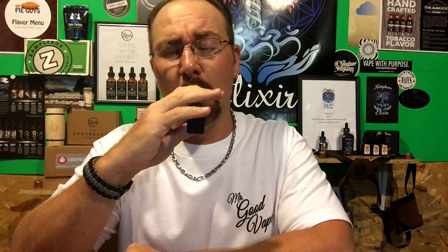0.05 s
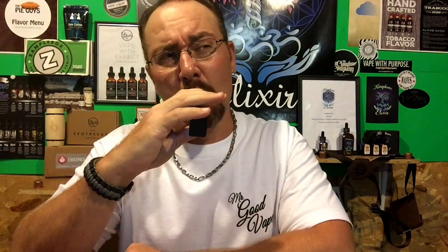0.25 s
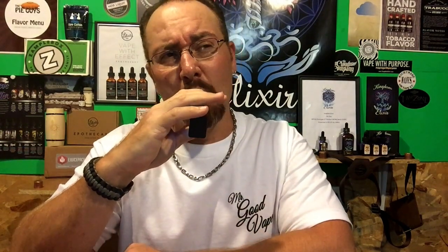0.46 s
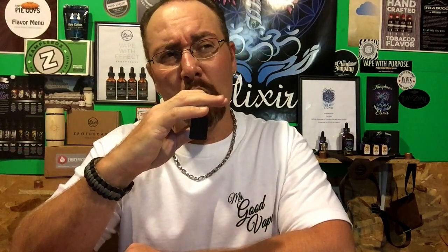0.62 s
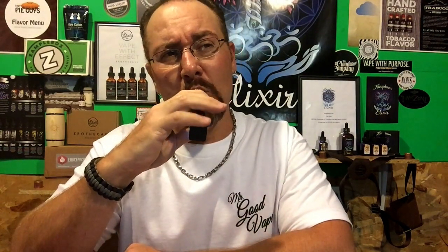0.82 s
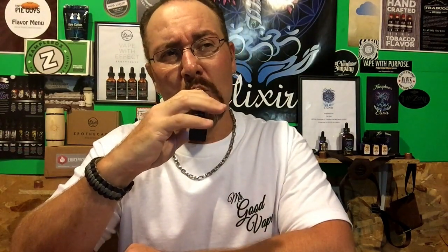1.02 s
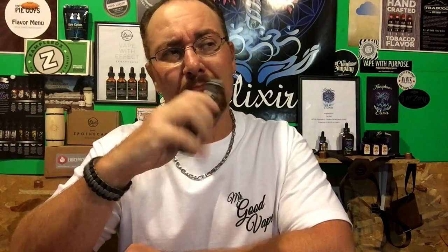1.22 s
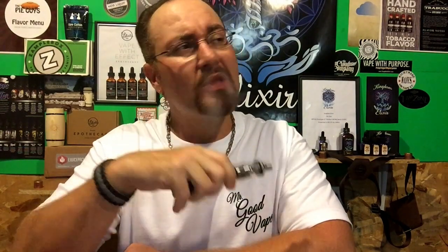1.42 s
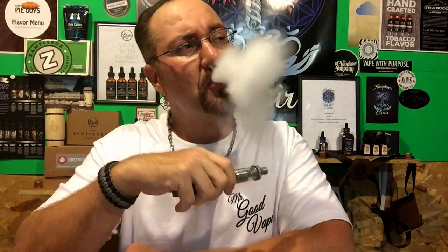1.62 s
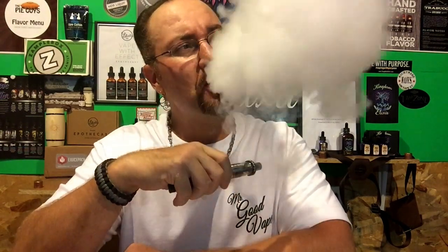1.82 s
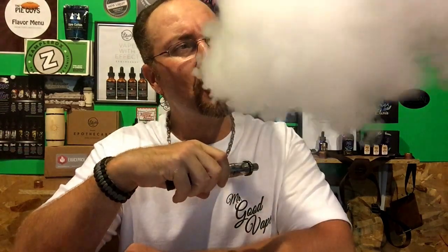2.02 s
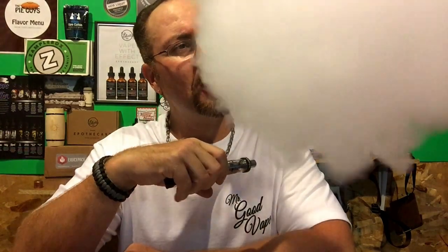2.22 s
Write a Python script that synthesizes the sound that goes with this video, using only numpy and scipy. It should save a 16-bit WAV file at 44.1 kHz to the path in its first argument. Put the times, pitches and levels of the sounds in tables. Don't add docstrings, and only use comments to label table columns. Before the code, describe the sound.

Airy, crackling hiss of an electronic vaporizer being drawn on, then one quick lip-like crackling pop.

```python
import sys
import numpy as np
from scipy import signal
from scipy.io import wavfile
from scipy.ndimage import uniform_filter1d

SR = 44100
rng = np.random.default_rng(int(sys.argv[2]) if len(sys.argv) > 2 else 0)


def pcm_store(signal):
    levels = np.round(np.clip(np.atleast_2d(signal), -1, 1) * 32767)
    wavfile.write(sys.argv[1], SR, levels.astype(np.int16).T)


def invert_db(x):
    u = np.asarray(x, float) / 20
    return 10 ** u


N = 99533


def level(x, db):
    return x * invert_db(db) / np.sqrt(np.mean(x ** 2))


def band(x, hz, width_hz):
    return signal.lfilter(*signal.iirpeak(min(hz, .45 * SR), hz / width_hz, fs=SR), x)


def band_noise(hz, width_hz):
    return band(band(rng.standard_normal(N), hz, width_hz), hz, width_hz)


def curve(table, column):
    rows = np.array(table)
    return np.interp(np.arange(N) / SR, rows[:, 0], rows[:, column])


def walk(rate_hz):
    hold = int(SR / rate_hz)
    steps = np.repeat(rng.standard_normal(N // hold + 1), hold)
    return 1.13 * uniform_filter1d(uniform_filter1d(steps, hold), hold)[:N]


def impulse(at_s, db):
    x = np.zeros(N)
    x[int(at_s * SR)] = invert_db(db)
    return x


def vaporizer():
    # (time [s], level [dB], low-resonance gurgle [dB], slot whistle [dB], top leak [dB])
    draw = [(0, -49.5, 10, 0.5, 1), (.05, -50.5, 3.5, 0, 0), (.15, -49, 3, -0.5, 3),
            (.25, -49.5, -0.5, 1.5, -1), (.35, -48.5, 3, 0.5, -1), (.45, -48.5, 3, 0.5, 0),
            (.55, -47, 2.5, 0, -1), (.65, -47.5, 0.5, -2, -2), (.78, -48, 0.5, 1, 0),
            (.9, -48.5, 1, 0.5, -3), (1.1, -49.5, 2.5, -0.5, -1.5), (1.16, -49, 0, 0.5, -1),
            (1.2, -52, 9.5, -0.5, 4), (1.22, -59, 8, -4, 6), (1.235, -69, 12, -6, 14),
            (1.26, -89, 9, -5, 25), (1.3, -130, 0, -5, 27.5)]
    # (frequency [Hz], width [Hz], level [dB])
    tube_modes = [(1134, 467, -14), (1764, 580, -16), (2363, 105, -0.5), (2606, 166, -1), (2875, 400, -8.5),
                  (3564, 380, -1.5), (3940, 464, -1.5), (4535, 660, -11.5), (5920, 920, -14),
                  (7215, 470, -8), (8420, 1240, -19.5), (9960, 770, -21.5), (11280, 1030, -24.5),
                  (12700, 1300, -31.5), (14000, 1100, -30), (15500, 820, -35)]
    # (time [s], peak [dB])
    spit_events = [
        (.0500, -35.5),
        (.1432, -33),
        (.185, -41),
        (.2100, -40),
        (.2505, -39),
        (.3682, -32.5),
        (.9657, -43),
        (1.044, -42),
        (1.1608, -44),
    ]
    skirt_db = -3.5
    sizzle_db, sizzle_per_s, sizzle_scatter_db = -7, 900, 1
    t = np.arange(N) / SR
    gurgle_db, whistle_db, leak_db = (curve(draw, column) for column in (2, 3, 4))
    treble_sag_db = 4 * t
    closing_db = -50 * np.clip(t - 1.13, 0, None)

    def tube(x, flicker_db):
        out = 0
        for k, (hz, width_hz, mode_db) in enumerate(tube_modes):
            db = mode_db + flicker_db * walk(18.07) - treble_sag_db * hz / 10000
            if hz < 2000:
                db = db + gurgle_db
            if 3200 < hz < 5000:
                db = db + whistle_db
            if hz > 12000:
                db = db + leak_db
            if 7000 < hz < 12000:
                db = db + closing_db
            skirt = band(x, hz, width_hz)
            ring = band(skirt, hz, width_hz) + invert_db(skirt_db) * skirt
            out = out + (-1) ** k * invert_db(db) * ring
        return out

    chance, size = rng.random((2, N))
    sizzle = (chance < sizzle_per_s / SR) * invert_db(-sizzle_scatter_db * np.log(size + 1e-9))
    drive = rng.standard_normal(N) + level(sizzle - sizzle.mean(), sizzle_db)
    hiss = level(tube(drive, flicker_db=.9), 0) * invert_db(curve(draw, 1) + .4 * walk(6.4))

    clicks = sum(impulse(s, db) for s, db in spit_events)
    spits = tube(clicks, flicker_db=0) + invert_db(-6) * band(clicks, 1680, 1200)
    spits = signal.lfilter(*signal.butter(2, 7500, fs=SR), spits)
    loudest_db = max(db for s, db in spit_events)
    return hiss + spits * invert_db(loudest_db) / np.abs(spits).max()


def engine():
    # (time [s], cycle rate [Hz], 2nd order [dB], 3rd order [dB], 4th order [dB])
    orders_table = [(0.0, 41.8, -47, -53, -55), (0.04, 42.1, -46.5, -64, -62), (0.29, 42.74, -47, -59, -58),
                    (0.38, 43.3, -50, -59, -65), (0.54, 43, -58, -59, -61), (0.56, 43.15, -62, -61, -83),
                    (0.58, 43.31, -58.5, -62, -63), (0.78, 44.08, -58, -67, -61),
                    (0.81, 44.18, -52, -80, -55), (0.83, 44.0, -51.5, -67, -59.5),
                    (1.26, 41.3, -68, -64.5, -69.5), (1.32, 40.67, -68, -66, -65.5),
                    (1.43, 39.74, -83, -56.5, -58), (1.52, 38.4, -66, -59, -58.5),
                    (1.6, 37.2, -84, -75, -62.5), (1.84, 35.2, -75, -61.5, -60.5),
                    (1.88, 34.33, -80, -68, -77), (2.0, 31.3, -69, -73, -76)]
    wobble_db, phase_wander_rad = 1.3, .6
    rumble_db, throb_db, rumble_fade_db_per_s = -60, 3.5, -3
    under_db, under_fade_db_per_s = -69, -5.5
    gone_s, gone_db_per_s = 1.965, -200
    t = np.arange(N) / SR
    phase = 2 * np.pi * np.cumsum(curve(orders_table, 1)) / SR
    orders = 0
    for k in (2, 3, 4):
        wobble = np.sqrt(2) * invert_db(wobble_db * walk(19.0))
        wander = phase_wander_rad * k / 5 * walk(14.15)
        orders = orders + invert_db(curve(orders_table, k)) * wobble * np.sin(k * phase + wander)
    rumble = level(band_noise(140, 90) * invert_db(throb_db * walk(12.76)), rumble_db)
    rumble = rumble * invert_db(rumble_fade_db_per_s * t)
    under = level(band_noise(55, 20), under_db) * invert_db(under_fade_db_per_s * t)
    gone = invert_db(gone_db_per_s * np.clip(t - gone_s, 0, None))
    return (orders + rumble) * gone + under


def room_tone():
    # (frequency [Hz], density [dB per Hz])
    spectrum = [(30, -21), (60, 0), (160, 4.5), (350, -8.5), (1000, -6.5), (4500, -23), (10000, -34.5),
                (15500, -37.5)]
    # (frequency [Hz], width [Hz], level [dB])
    duct_modes = [(280, 63, -10), (337, 46, -11.5), (990, 185, -13.5), (2180, 250, -14)]
    tone_db, swell_db, flicker_db, bass_fade_db_per_s = -63, .3, 1.0, -4.5
    duct_flicker_db, duct_fade_db_per_s = 2.0, -2.0
    t = np.arange(N) / SR
    swell = swell_db * walk(4.8)
    spectrum_hz, spectrum_db = np.transpose(spectrum)
    air = 0
    for hz in 35 * 2 ** np.arange(0, 8.9, .5):
        db = np.interp(np.log(hz), np.log(spectrum_hz), spectrum_db) + swell
        db = db + flicker_db * (1 + 300 / hz) * walk(8.0)
        db = db + bass_fade_db_per_s * (t - 1) * min(200 / hz, 1)
        air = air + invert_db(db) * band_noise(hz, hz / 2)
    duct = 0
    for hz, width_hz, db in duct_modes:
        drift_db = duct_flicker_db * walk(11.0) + duct_fade_db_per_s * t * 300 / hz
        duct = duct + level(band_noise(hz, width_hz) * invert_db(drift_db), db)
    return invert_db(tone_db) * (level(air, 0) + duct)


def seal():
    # (time [s], pop level [dB], pop pitch [Hz], pop decay [s], crack level [dB])
    ticks = [(1.5140, -52, 2900, .005, -55), (1.5163, -44, 2600, .005, -43), (1.5172, -40, 2650, .009, -46),
             (1.5175, -47, 1250, .010, -52), (1.5205, -42, 2500, .005, -52), (1.5203, -44, 1500, .008, -70),
             (1.5226, -46, 2400, .005, -60), (1.5249, -29, 1230, .005, -41), (1.5250, -43, 2600, .005, -70),
             (1.5275, -50, 2500, .007, -58), (1.5255, -50, 3700, .006, -70), (1.5295, -53, 3650, .008, -58),
             (1.5327, -40, 1350, .0052, -64), (1.5345, -49, 1900, .005, -66),
             (1.5388, -62, 6100, .005, -68), (1.5425, -54, 950, .010, -70), (1.5470, -54, 330, .05, -70),
             (1.5481, -42, 1500, .006, -66), (1.5506, -45, 1700, .006, -68)]
    # (frequency [Hz], width [Hz], level [dB])
    crack_bands = [(2600, 800, 1), (5200, 700, -4), (7000, 1400, -1), (9400, 800, -3), (12800, 2400, 3),
                   (14800, 1500, -2)]
    peel_s, peel_rise_s, peel_fall_s, peel_db = 1.5162, .002, .0055, -51
    pop_rise_s, pop_collapse, crack_t60_s = .0008, 1.6, .005
    t = np.arange(N) / SR
    noise = level(sum(invert_db(db) * band_noise(hz, width_hz) for hz, width_hz, db in crack_bands), 0)
    late_s = t - peel_s
    out = invert_db(peel_db) * noise * np.exp(-np.where(late_s < 0, -late_s / peel_rise_s, late_s / peel_fall_s))
    for s, pop_db, hz, pop_t60_s, crack_db in ticks:
        age = np.clip(t - s, 0, None)
        pop_fade = invert_db(-60 * (age / pop_t60_s) ** pop_collapse)
        pop = np.sin(2 * np.pi * hz * age) * (1 - np.exp(-age / pop_rise_s)) * pop_fade
        crack = noise * invert_db(-60 * age / crack_t60_s)
        out = out + (t >= s) * (invert_db(pop_db) * pop + invert_db(crack_db) * crack)
    return out


def thumps():
    # (time [s], peak [dB], pitch [Hz], length [s])
    events = [
        (1.85, -65.5, 200, 0.031),
        (1.935, -59, 110, 0.022),
        (2.023, -56, 160, 0.023),
        (2.214, -59.5, 148, 0.02),
    ]
    t = np.arange(N) / SR
    out = 0
    for s, db, hz, length_s in events:
        out = out + invert_db(db) * np.exp(-((t - s) / length_s) ** 2) * np.sin(2 * np.pi * hz * t)
    return out


def room_tail(near):
    t60_s, damp_hz, wet_db = .22, 6000, -19
    age = np.arange(SR // 2) / SR
    tail = rng.standard_normal(len(age)) * invert_db(-60 * age / t60_s) * (age > .004)
    tail = signal.lfilter(*signal.butter(1, damp_hz, fs=SR), tail)
    return invert_db(wet_db) * signal.fftconvolve(near, tail / np.sqrt(np.sum(tail ** 2)))[:N]


def scene():
    near = vaporizer() + seal()
    mono = near + room_tail(near) + engine() + thumps() + room_tone()
    return np.array([mono, mono])


def band_limit(x):
    return signal.sosfilt(signal.butter(12, 15850, fs=SR, output="sos"), x)


def record(dry):
    top_cut = signal.ellip(8, .2, 70, 15800, fs=SR, output="sos")
    mix = signal.sosfilt(top_cut, dry)
    return band_limit(mix)


dry = scene()
out = record(dry)
pcm_store(out)
```